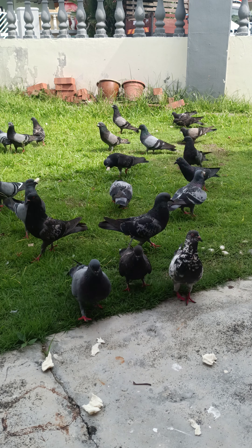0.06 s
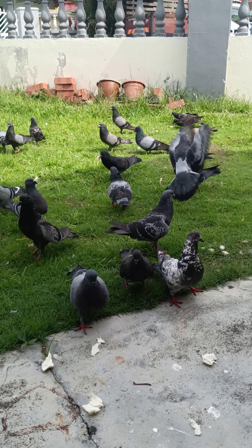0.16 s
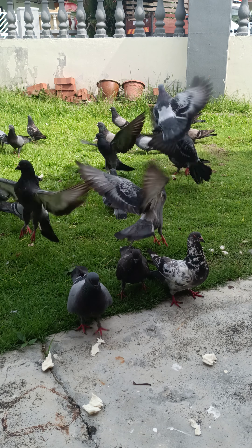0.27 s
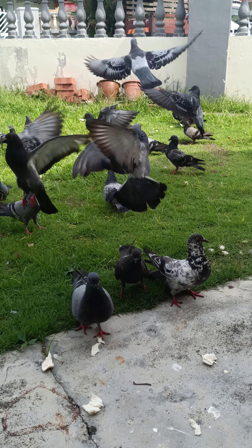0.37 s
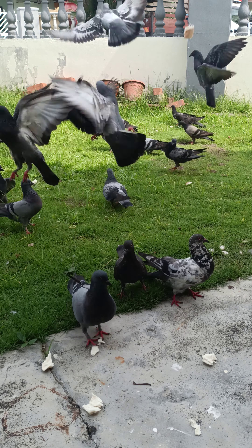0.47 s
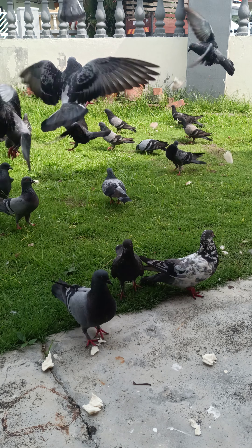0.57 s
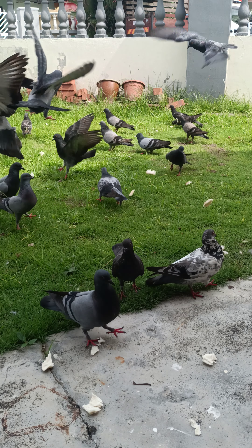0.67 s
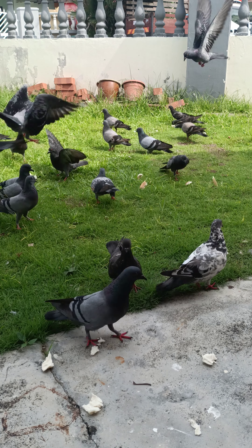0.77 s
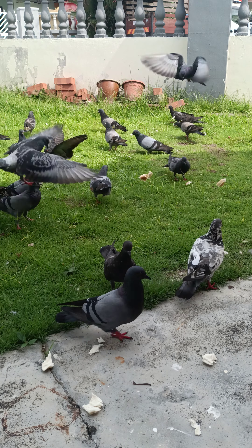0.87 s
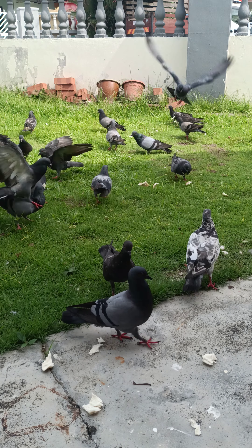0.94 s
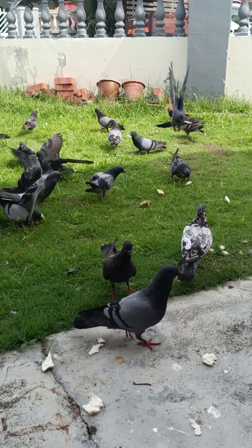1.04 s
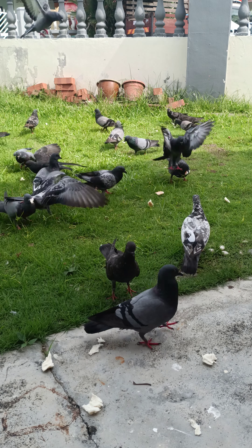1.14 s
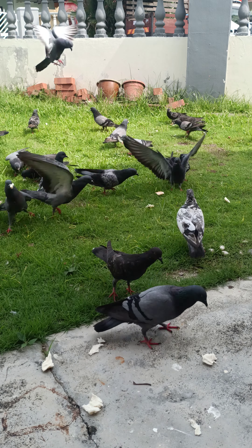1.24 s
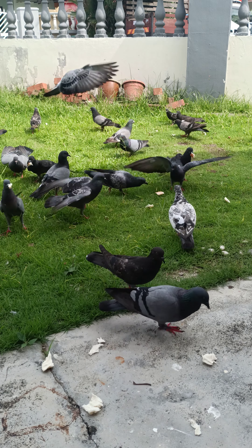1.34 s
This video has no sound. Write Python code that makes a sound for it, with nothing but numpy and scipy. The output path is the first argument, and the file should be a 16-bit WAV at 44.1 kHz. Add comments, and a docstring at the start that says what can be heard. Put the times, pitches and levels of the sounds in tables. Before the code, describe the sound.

Sharp wing claps and feathery rustling burst out from nearby pigeons, fading to soft, sparse flutters outdoors

```python
"""Pigeons flapping in a walled yard

Pigeons squabble over bread on the lawn: a flurry of wing claps close by, then fainter fluttering.
Each clap is a crack, a pop of trapped air, a slap of hiss and a spray of feather clicks.
Between claps the feathers rustle and swish, and the wings whirr and push out soft thumps of air.
The yard returns a short bright wash of noise, over a low outdoor rumble."""
import sys
import numpy as np
from scipy import signal
from scipy.fft import rfft, irfft
from scipy.io import wavfile

SR = 44100
rng = np.random.default_rng(int(sys.argv[2]) if len(sys.argv) > 2 else 0)


def log_audio(samples):
    """Write samples as a 16-bit WAV file to the path given in sys.argv[1]."""
    # one column per channel
    frames = np.atleast_2d(samples).T
    # limit to full scale, then quantise
    limited = np.clip(frames, -1, 1)
    pcm = np.round(limited * 32767).astype(np.int16)
    wavfile.write(sys.argv[1], SR, pcm)


N = 61740
T = np.arange(N) / SR   # time of each sample, in seconds
HZ = np.maximum(np.arange(N // 2 + 1) * SR / N, 1)   # frequency of each spectrum bin


def from_db(db):
    """Turn decibels into a gain."""
    return 10 ** (np.asarray(db) / 20)


def rms_one(x):
    """Scale a signal to unit power."""
    return x / np.sqrt(np.mean(x ** 2) + 1e-20)


def in_time(rows):
    """Join the rows of a curve over time by straight lines, one curve per column."""
    seconds, *columns = np.transpose(rows)
    return [np.interp(T, seconds, column) for column in columns]


def at_hz(points):
    """Read a curve over frequency at every bin, joining its points on a log frequency scale."""
    hz, value = np.transpose(points)
    return np.interp(np.log(HZ), np.log(hz), value)


def drift(hz):
    """Slow random wandering with unit spread: noise that fades out above the given frequency."""
    spectrum = rfft(rng.standard_normal(N)) / (1 + (HZ / hz) ** 4)
    return rms_one(irfft(spectrum, N))


def hiss():
    """Three unrelated white noises."""
    return rng.standard_normal((3, N))


def clicks():
    """Three unrelated streams of tiny clicks: feather barbs and quills snapping past each other."""
    clicks_per_s, spread_db = 16000, 3.5
    extra_db = spread_db * np.minimum(rng.exponential(1, (3, N)), 4)
    sizes = from_db(extra_db) * rng.choice([-1, 1], (3, N))
    happens = rng.random((3, N)) < clicks_per_s / SR
    return sizes * happens


def stereo(streams, gain):
    """Colour three streams and mix them as shared, left and right sound, with unit power."""
    # how alike left and right are: f/Hz, likeness (0 to 1)
    likeness = [(60, 1), (250, 0.85), (600, 0.61), (1300, 0.23), (3000, 0.37), (12000, 0.068)]
    alike = np.clip(at_hz(likeness), 0, 1)
    spectra = rfft(streams) * gain
    shared = np.sqrt(alike) * spectra[0]
    separate = np.sqrt(1 - alike) * spectra[1:]
    return rms_one(irfft(shared + separate, N))


def swell(age, peak_s):
    """A pulse shape that rises to 1 at peak_s, then dies away."""
    u = age / max(peak_s, 1e-5)
    return u * np.exp(1 - u)


def ambience():
    """Low outdoor rumble: coloured noise that slowly grows louder."""
    start_db, rise_db_per_s = -57, 2.0
    # colour of the outdoor noise: f/Hz, relative level/dB
    outdoor_colour = [(20, -27), (45, -8), (95, 1.5), (145, -1), (200, -10.5), (350, -8), (700, -17.5),
                      (1400, -46), (3000, -28), (8000, -27.5), (16000, -33)]
    return from_db(start_db + rise_db_per_s * T) * stereo(hiss(), from_db(at_hz(outdoor_colour)))


def yard(x):
    """Walls and porch scatter sound into a dense wash that builds up, holds briefly and dies."""
    build_s, hold_s = 0.005, 0.024
    t60_s = 0.22   # time to die by 60 dB
    # colour of the wash: f/Hz, relative level/dB
    wash_colour = [(100, 6), (300, -5.5), (600, 2), (1000, -1), (1700, 0), (3000, 2), (7000, -1),
                   (16000, 1.5)]
    build = 1 - np.exp(-(T / build_s) ** 2)
    decay = from_db(-60 * np.maximum(T - hold_s, 0) / t60_s)
    shape = build * decay
    wash = stereo(hiss(), from_db(at_hz(wash_colour)))
    response = wash * shape / np.sqrt(np.sum(shape ** 2))
    return signal.fftconvolve(x, response, axes=1)[:, :N]


def puffs():
    """Downstrokes push air at the microphone: soft thumps of low noise with a bell-shaped swell."""
    # puffs of downwash: t/s, level/dB, half length/s
    puff_list = [(0.378, -48, 0.012), (0.511, -37.5, 0.015), (0.544, -45, 0.028), (0.815, -59.5, 0.065),
                 (0.933, -56, 0.017), (1.071, -45.5, 0.0044), (1.096, -53, .035), (1.202, -77, 0.011)]
    # colour of the moving air: f/Hz, relative level/dB
    puff_colour = [(20, -12), (50, -5), (90, 9.5), (160, -6.5), (260, -2), (500, -15), (1500, -53)]
    push = np.zeros(N)
    for s, db, half_s in puff_list:
        push += from_db(db) * np.exp(-((T - s) / half_s) ** 2 / 2)
    return push * stereo(hiss(), from_db(at_hz(puff_colour)))


def whirr():
    """Eddies shed by the nearest wings: a rough, low, half-pitched tone that wavers at random."""
    width_hz = 50
    evenness = 0.52   # 0 leaves the loudness fully uneven, 1 makes it steady
    # whirr of air around the wings: t/s, level/dB, centre f/Hz
    whirr_curve = [(0, -69, 380), (.31, -89, 400), (.338, -52, 399.3), (.405, -37.5, 385.2),
                   (.424, -29, 352), (.438, -60, 336.3), (.452, -31, 301.4), (.475, -57, 278.7),
                   (.495, -42.5, 280.4), (.565, -31.5, 317.6), (.595, -42, 332.5), (.615, -52.5, 355.5),
                   (.66, -46, 372), (.69, -88, 325.7), (.73, -50.5, 280.8), (.78, -65, 350.4),
                   (.915, -61, 335.5), (.94, -43, 311.4), (.97, -82, 377.5), (1.04, -55, 422.6),
                   (1.065, -54, 440), (1.10, -44, 450), (1.15, -97, 400), (1.24, -57, 348.2),
                   (1.4, -67, 346.4)]
    db, hz = in_time(whirr_curve)
    eddies = drift(width_hz) + 1j * drift(width_hz)
    eddies = eddies / np.abs(eddies) ** evenness
    carrier = np.exp(2j * np.pi * np.cumsum(hz) / SR)
    return from_db(db) * rms_one(np.real(eddies * carrier))


def rustle():
    """Feathers slide over each other in a stream of clicks; strong strokes add a duller swish of air."""
    flicker_db, flicker_hz = 1, 65
    swish_db, swish_at_rustle_db = -34.5, -32   # the swish level at this rustle level
    swish_growth = 2.07   # dB of swish per dB of rustle
    # loudness of the beating wings: t/s, level/dB
    rustle_curve = [(0, -60.5), (.185, -60.5), (.213, -41), (.31, -39), (.35, -35), (.402, -32.5),
                    (.435, -36.5), (.512, -31), (.555, -33.5), (.605, -33.5), (.68, -41), (.80, -47.5),
                    (.865, -42), (.91, -46), (.96, -38), (1.04, -42.5), (1.13, -43.5), (1.18, -49.5),
                    (1.29, -48.5), (1.35, -52), (1.385, -44), (1.4, -44.5)]
    # colour of the sliding feathers: f/Hz, relative level/dB
    rustle_colour = [(100, -4), (300, 1), (700, -3), (1200, 3), (2200, 1), (4000, 2.5), (7000, 3.5),
                     (11000, 0), (16000, 2.5)]
    # colour of the air through the vanes: f/Hz, relative level/dB
    swish_colour = [(100, -3), (300, -0.5), (600, 4), (1200, -1.5), (2300, -8), (3500, -6), (7000, -10),
                    (16000, -53)]
    db, = in_time(rustle_curve)
    db = db + flicker_db * drift(flicker_hz)
    swish_gain = from_db(swish_db + swish_growth * (db - swish_at_rustle_db))
    swish = swish_gain * stereo(hiss(), from_db(at_hz(swish_colour)))
    feathers = from_db(db) * stereo(clicks(), from_db(at_hz(rustle_colour)))
    return swish + feathers


def claps():
    """Wing tips meet: crack, pop of squeezed air, slap of the vanes and feather spray.

    Returns the direct sound and what goes to the yard."""
    crack_width_s, crack_delay_s = .00004, 0.000403   # the crack follows the first touch
    slap_low_hz, slap_high_hz = 430, 2800
    tail_db, tail_s = (-7, -11), 0.0051   # the feathers settle: level (left, right), swell time
    pop_roughness, pop_rough_hz = 0.19, 400   # the closing air pocket is not a steady cavity
    pop_send_db = -5   # the pop reaches the walls more weakly than the rest
    # wing claps: t/s, crack/dB, pop/dB, pop f/Hz, pop swell/ms, slap/dB,
    # feather spray/dB, spray swell/ms, spray low edge f/Hz, send to the yard/dB
    clap_list = [ (0.116, -100, -80, 1490, .5, -59.5, -56.5, 3, 1500, 4),
                 (0.2172, -21.5, -30, 1585, 1.2, -42, -26, 1.47, 611, -1.5),
                 (.2190, -33, -39, 620, 2, -57, -36, 0.53, 1490, 7),
                 (0.3334, -18.5, -35, 407, 3.7, -52, -23, 0.99, 2490, -4),
                 (0.3558, -40, -30, 1350, 1.1, -29, -30, 2.5, 2000, -15.5),
                 (.3668, -27, -14.5, 1200, 0.41, -27.5, -17, 0.58, 1490, -4.5),
                 (.4510, 0, -11.5, 2070, 0.62, -27, -14, 1.96, 920, -5.5),
                 (0.4881, -0.5, -22, 1030, 0.89, -21, -16.5, 1.3, 600, -12.5),
                 (0.5712, -17, -24.5, 1108, 2.2, -35, -24, 1.3, 1500, -5.5),
                 (0.5753, -30, -32, 700, 2.3, -31, -23, 1.6, 1010, -10.5),
                 (.6340, -55, -31, 813, 1.98, -42, -52, 2.0, 2000, -3),
                 (0.6598, -24, -51, 1220, 0.85, -51, -23.5, 0.67, 8200, -11),
                 (.6928, -15.5, -19, 923, 1.52, -30, -23.5, 2.4, 1260, -0.5),
                 (.8550, -45, -60, 1200, 1.3, -68, -38.5, 1.14, 2000, -2),
                 (0.9368, -50, -37, 1300, 1.7, -39.5, -60, 2, 200, -9),
                 (0.9755, -26, -37, 1240, .8, -36, -35, 0.85, 795, -5),
                 (1.007, -43, -43, 1258, 2.1, -46.5, -41.5, 1.1, 1000, 8),
                 (1.0564, -43, -23.5, 1820, 0.87, -32, -37.5, 1.5, 1200, -16),
                 (1.0598, -23, -32.5, 458, 2.26, -33, -26.5, 0.73, 5050, -0.5),
                 (1.153, -63, -45, 1194, 3.3, -69, -51.5, 2.5, 1983, 5.5),
                 (1.2480, -54, -66, 1190, 1.09, -61.5, -55, 2.3, 3040, 10),
                 (1.299, -50, -47.5, 1330, 3.8, -50, -55, 2.3, 1020, 0), ]
    # colour of the feather spray: f/Hz, relative level/dB
    spray_colour = [(200, -16), (600, -13), (1300, 0.5), (2500, -4.5), (4000, 0.5), (7000, 3.5),
                    (11000, 0.5), (16000, -2.5)]

    direct, sent = np.zeros((2, N)), np.zeros((2, N))
    sprays = stereo(clicks(), from_db(at_hz(spray_colour)))
    slap_gain = 1 / np.sqrt((1 + (slap_low_hz / HZ) ** 2) * (1 + (HZ / slap_high_hz) ** 4))
    slaps = stereo(hiss(), slap_gain)
    wobble = pop_roughness * drift(pop_rough_hz)
    for s, crack_db, pop_db, pop_hz, pop_ms, slap_db, spray_db, spray_ms, edge_hz, send_db in clap_list:
        start = int(s * SR)
        span = slice(start, start + SR // 12)
        age = T[span] - T[span][0]
        u = (age - crack_delay_s) / crack_width_s
        crack = -u * np.exp((1 - u * u) / 2)   # one sharp swing up and down
        tone = np.sin(2 * np.pi * pop_hz * age + wobble[span])
        pop = from_db(pop_db) * swell(age, pop_ms / 1000) * tone
        spray = signal.lfilter(*signal.butter(2, edge_hz, "high", fs=SR), sprays[:, span])
        tail = from_db(tail_db)[:, None] * swell(age, tail_s)
        brush = swell(age, spray_ms / 1000) + tail
        brushed = brush * (from_db(slap_db) * slaps[:, span] + from_db(spray_db) * spray)
        clap = from_db(crack_db) * crack + brushed
        direct[:, span] += clap + pop
        sent[:, span] += from_db(send_db) * (clap + from_db(pop_send_db) * pop)
    return direct, sent


def scene():
    """The birds, a little to the right, in the yard."""
    left_lag_s = .00012   # the sound arrives later on the left
    whirr_send_db = -6.5   # share of the whirr that goes to the yard
    direct, sent = claps()
    eddies = whirr()
    left, right = direct + rustle() + eddies
    late_left = np.pad(left, (int(left_lag_s * SR), 0))[:N]
    birds = np.array([late_left, right])
    wash = yard(sent + from_db(whirr_send_db) * eddies)
    return birds + wash + puffs() + ambience()


def port(x, resonances):
    """A microphone port resonates: a chain of peaks and dips in the spectrum."""
    for hz, db, q in resonances:
        w, a = 2 * np.pi * hz / SR, from_db(db / 2)
        k, c = np.sin(w) / (2 * q), -2 * np.cos(w)
        x = signal.lfilter([1 + k * a, c, 1 - k * a], [1 + k / a, c, 1 - k / a], x)
    return x


def record(dry):
    """Each microphone port colours its side; the tallest peaks are rounded and the top is cut."""
    peak_limit, cutoff_hz = .72, 15850
    # resonances of the left port: f/Hz, peak or dip/dB, sharpness Q
    left_port = [(5620, 5.5, 3.6), (6680, 12.5, 7.3), (8010, -15.5, 2), (11700, 2.5, 5.8),
                 (15000, 7.5, 9.8), (15300, 6.5, 12)]
    # resonances of the right port: f/Hz, peak or dip/dB, sharpness Q
    right_port = [(4000, -2, 0.91), (6420, -10, 3.18), (7880, 2.5, 2.6), (10700, 3, 1.13),
                  (14600, -15, 3.2)]
    coloured = np.array([port(dry[0], left_port), port(dry[1], right_port)])
    rounded = coloured / (1 + (coloured / peak_limit) ** 4) ** .25
    top_cut = signal.ellip(10, .3, 80, cutoff_hz, fs=SR, output="sos")
    return signal.sosfilt(top_cut, rounded)


dry = scene()
out = record(dry)
log_audio(out)
```